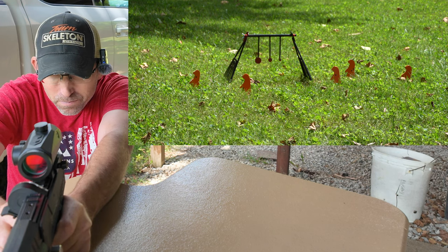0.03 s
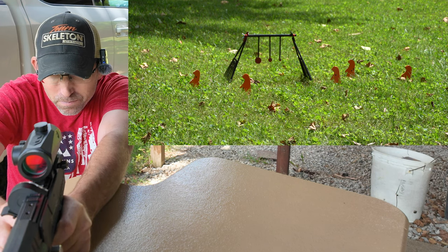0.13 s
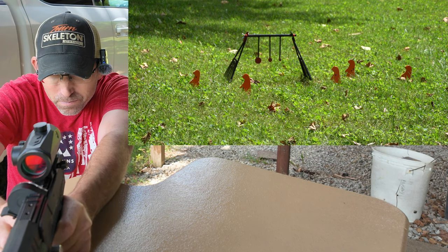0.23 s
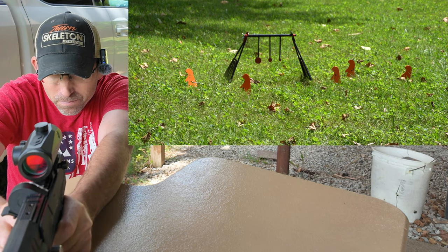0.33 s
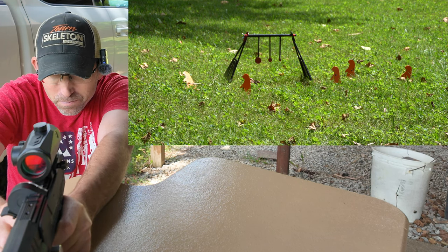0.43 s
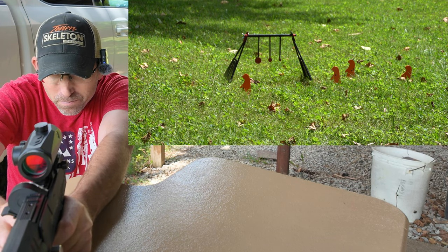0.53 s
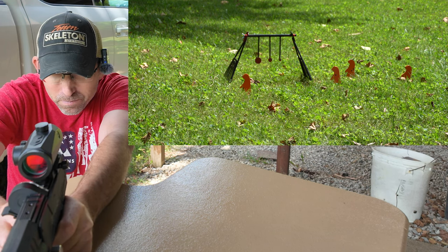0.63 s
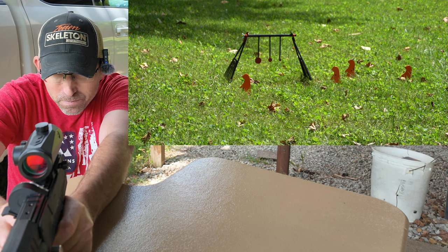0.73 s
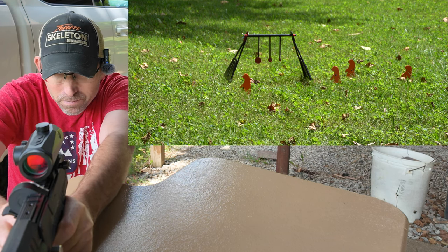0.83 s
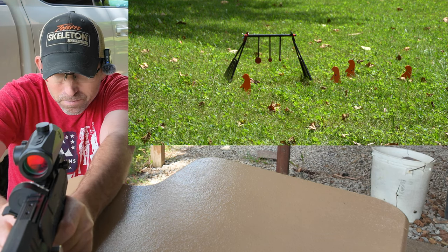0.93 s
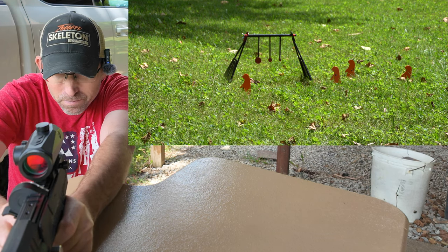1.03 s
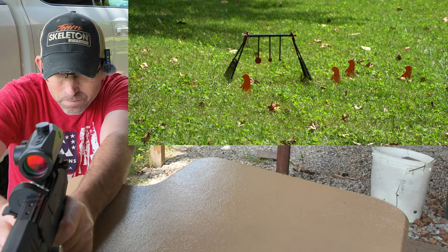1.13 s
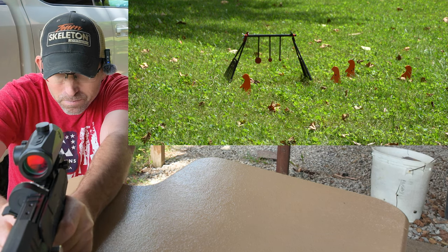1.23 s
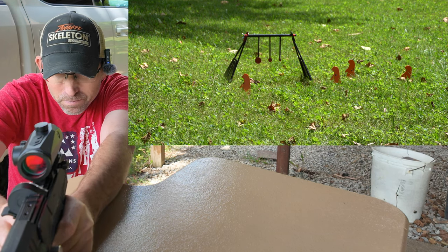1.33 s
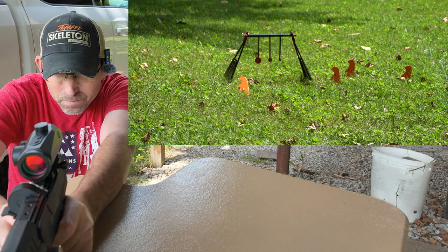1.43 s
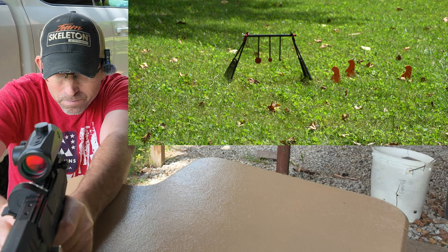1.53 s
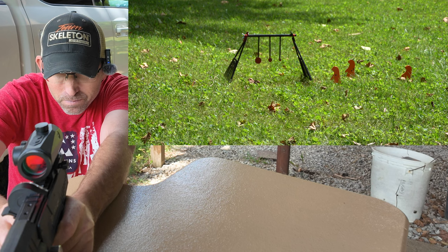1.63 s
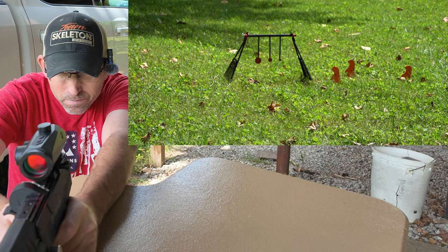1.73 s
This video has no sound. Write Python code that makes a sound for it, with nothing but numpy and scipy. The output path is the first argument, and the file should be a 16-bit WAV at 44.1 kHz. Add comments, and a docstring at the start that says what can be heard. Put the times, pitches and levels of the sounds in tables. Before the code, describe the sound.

An air pistol fires twice, about a second apart, close to the microphone under a shelter by a lawn. Right after each sharp pop, the pellet hits a small steel plate with a bright, short ring.

```python
"""An air pistol fires twice from under a shelter by a lawn, each shot knocking over a small steel plate.
A shot is a hammer click, a pressure pulse of gas and the clatter of the action; the shelter resonates,
the yard reverberates and a wall reflects a dull slap. About 70 ms after the pulse the pellet cracks on
a plate, whose modes ring and throb as it tumbles until the grass damps them. Small ticks follow.
Quiet air, distant insects and a low drone lie underneath."""
import sys
import numpy as np
from scipy import signal
from scipy.fft import rfft, irfft
from scipy.io import wavfile

SR = 44100
rng = np.random.default_rng(int(sys.argv[2]) if len(sys.argv) > 2 else 0)


def to_wav(s):
    """Save 16-bit WAV."""
    ch = np.atleast_2d(s).T  # columns
    pcm = np.round(np.clip(ch, -1, 1) * 32767)  # PCM
    wavfile.write(sys.argv[1], SR, pcm.astype(np.int16))


N = 79380
T = np.arange(N) / SR
HZ = np.fft.rfftfreq(N, 1 / SR)


def amp(db):
    """Amplitude ratio of a level in decibels."""
    return 10 ** (np.asarray(db) / 20)


def unit(x):
    """Normalisation to an rms of one."""
    return x / np.sqrt(np.mean(abs(x) ** 2) + 1e-20)


def read(points, hz, column=1):
    """Interpolation of a table column on a log-frequency axis."""
    columns = np.transpose(points)
    return np.interp(np.log(hz + 1), np.log(columns[0] + 1), columns[column])


def add(mix, s, sound):
    """Superposition of a sound delayed by s seconds."""
    start = max(round(s * SR), 0)
    mix[:, start:] += sound[..., :N - start]


def pan(db):
    """Level-difference panning: left and right gains."""
    return amp(np.array([[.5], [-.5]]) * db)


def noise(colour, place):
    """Partial coherence: two independent noises mix into a coloured stereo pair of unit rms."""
    a, b = rfft(rng.standard_normal((2, N)))
    coherence = np.clip(read(place, HZ, column=2), -1, 1)
    mid, side = a * np.sqrt(1 + coherence), b * np.sqrt(1 - coherence)
    spectrum = np.array([mid + side, mid - side]) * amp(read(colour, HZ)) * pan(read(place, HZ))
    return unit(irfft(spectrum, N))


# Spectra of the background: (frequency [Hz], relative level [dB])
AIR_SPECTRUM = [(25, -16), (50, -13.5), (80, -2.5), (130, 2), (250, -8), (400, -8), (650, -3), (1100, -9),
                (1900, -14.5), (2900, -14.5), (3800, -18.5), (7000, -23.5), (9500, -33), (16000, -42)]
INSECT_SPECTRUM = [(3500, -34), (5000, -10), (5800, 2), (6500, -0.5), (7300, -18.5), (9000, -40.5)]
DRONE_SPECTRUM = [(40, -30), (70, -3.5), (86, 1.5), (110, -15), (200, -45.5), (1000, -91)]
# Their envelopes: (time [s], level [dB])
AIR_ENVELOPE = [(0, -61.5), (.2, -61), (0.799, -63.5), (1.05, -65.5), (1.301, -67), (1.8, -63)]
INSECT_ENVELOPE = [(0, -71.5), (.7, -71.5), (1.2, -70.5), (1.8, -71)]
DRONE_ENVELOPE = [(0, -67.5), (.25, -67.5), (.6, -85)]
# Their stereo field: (frequency [Hz], left minus right [dB], coherence [ratio])
BACKGROUND_FIELD = [(200, 0, .998), (700, 0, 1), (2500, 0, 1), (6100, -1.3, 0.23)]
def background():
    """Ambient noise: air, a thin hiss of insects and a low drone that fades early."""
    layers = [(AIR_SPECTRUM, AIR_ENVELOPE), (INSECT_SPECTRUM, INSECT_ENVELOPE),
              (DRONE_SPECTRUM, DRONE_ENVELOPE)]
    return sum(noise(colour, BACKGROUND_FIELD) * amp(np.interp(T, *np.transpose(envelope)))
               for colour, envelope in layers)


# Stereo field of a knock: (frequency [Hz], left minus right [dB], coherence [ratio])
KNOCK_FIELD = [(500, 0.5, 0.95), (2000, -2.5, 0.99), (6000, 1.5, .87), (12000, 1, 1)]
def knock(colour, decay_s):
    """Impact transient: exponentially decaying noise, its energy set by the decay time."""
    fade = np.exp(-T / decay_s)
    return unit(noise(colour, KNOCK_FIELD) * fade) * np.sqrt(np.mean(fade ** 2))


# Impacts in the action: (time after the pop [s], relative level [dB], decay time [s])
ACTION_KNOCKS = [(-.0038, -22, .0015), (-.001, -13.5, .0015), (.0072, -19.5, .003), (.0098, -13, .002),
                 (0.0139, -18, .004), (0.0177, -15.5, .0025)]
# Their spectrum: (frequency [Hz], relative level [dB])
ACTION_SPECTRUM = [(100, -18.5), (600, -1), (1800, -1.5), (3800, 6.5), (5500, 3.5), (9000, -5.5),
                   (11500, -14), (16000, -20.5)]
def action(pop_s, shot_db, hammer_db):
    """Impact noise: the hammer clicks before the pop and the action clatters after it."""
    out = np.zeros((2, N))
    for delay, knock_db, decay_s in ACTION_KNOCKS:
        db = shot_db + knock_db + (hammer_db if delay < 0 else 0)
        add(out, pop_s + delay, amp(db) * knock(ACTION_SPECTRUM, decay_s))
    return out


def struck(modes, contact_s=.0003):
    """Free vibration: damped modes, their onset softened by the contact time of the blow."""
    onset = 1 - np.exp(-(T / contact_s) ** 2)
    return onset * sum(amp(db - 60 * T / t60) * np.sin(2 * np.pi * hz * T) for hz, db, t60 in modes)


# Direct and reflected paths of the pulse: (delay [s], gain [ratio])
PULSE_PATHS = [(0, 1), (.0018, 0.82), (0.0102, .45)]
# Modes of the table and the pistol's body: (frequency [Hz], relative level [dB], T60 [s])
BODY_MODES = [(339, -27.5, 0.14), (470, -29, .035), (588, -28.5, .04), (1220, -20.5, 0.0081)]
# Balance of the pop, mostly to the right: (frequency [Hz], left minus right [dB])
POP_BALANCE = [(200, 6.5), (500, -1), (1000, -6), (2000, -12.5), (4000, -2)]
def gas_pop(pulse_s=.00028, pulse_db=-1, cutoff_hz=1000):
    """Monopole radiation: the gas sends out a compression and a rarefaction, and jolts table and gun."""
    pulse = (1 - T / pulse_s) * np.exp(-T / pulse_s)
    pressure = np.zeros((2, N))
    for delay, gain in PULSE_PATHS:
        add(pressure, delay, gain * pulse)
    pressure = signal.lfilter(*signal.butter(1, cutoff_hz, fs=SR), pressure)
    pop = amp(pulse_db) * pressure + struck(BODY_MODES)
    return irfft(rfft(pop) * pan(read(POP_BALANCE, HZ)), N)


# Stereo field of the yard: (frequency [Hz], left minus right [dB], coherence [ratio])
YARD_FIELD = [(250, -4.5, .999), (500, .5, 1), (1000, 0.5, .8), (1990, 1.5, 0.95), (4500, 2.5, .55),
              (12000, 4, .4)]
def diffuse_tail(colour, t60):
    """Diffuse decay: each band of noise falls 60 dB in its own reverberation time."""
    hz, t, bands = signal.stft(noise(colour, YARD_FIELD), SR, nperseg=512)
    decay = amp(-60 * t / read(t60, hz)[:, None])
    return signal.istft(bands * decay, SR, nperseg=512)[1][:, :N]


# Spectrum of the yard's echo: (frequency [Hz], relative level [dB])
YARD_SPECTRUM = [(40, -24.5), (120, -2.5), (200, 0), (320, 3), (600, 3), (1300, -3), (2300, -3.5),
                 (3800, -3.5), (7000, -1), (9500, 0.5), (12000, -7.5), (16000, -9.5)]
# Its reverberation time: (frequency [Hz], T60 [s])
YARD_T60 = [(60, .5), (140, 0.82), (400, 0.59), (1200, .5), (4000, 0.56), (8000, 0.29), (15000, 0.31)]
def yard_echo(rise_s=.012, db=-21.5):
    """Reverberation: sound scattered around the yard builds up and dies away."""
    return (1 - np.exp(-T / rise_s)) * amp(db) * diffuse_tail(YARD_SPECTRUM, YARD_T60)


# Low modes of the shelter: (frequency [Hz], relative level [dB], T60 [s])
SHELTER_MODES = [(127, -53.5, 1.6), (135.2, -48.5, 1.5), (198, -38, 0.89), (268.6, -40.5, .35),
                 (332.5, -32, 0.25), (347, -34.5, .62), (389.5, -34.5, 0.27), (598.3, -38, 0.12)]
def shelter_boom(rise_s=.0083):
    """Resonance: the shot excites the shelter's modes, which hum on in random phase."""
    boom = sum(amp(db - 60 * T / t60) * np.sin(2 * np.pi * (hz * T + rng.random()))
               for hz, db, t60 in SHELTER_MODES)
    return (1 - np.exp(-T / rise_s)) * boom


# Spectrum of the wall's reflection: (frequency [Hz], relative level [dB])
SLAP_SPECTRUM = [(60, -28.5), (180, -5.5), (290, -2.5), (420, -6.5), (800, -19), (2000, -40), (8000, -62.5)]
def wall_slap(rise_s=.001, decay_s=.018, db=-28):
    """Discrete reflection: a nearby wall returns the shot as a dull burst."""
    return (1 - np.exp(-T / rise_s)) * amp(db) * knock(SLAP_SPECTRUM, decay_s)


# Shots: (time of the pop [s], shot gain [dB], echo gain [dB], extra hammer gain [dB])
PISTOL_SHOTS = [(0.2407, 1, 1, -2.5), (1.3443, 1, 0.5, 4)]
def pistol(slap_delay_s=.054):
    """Direct and reflected sound: each shot is answered by the yard, the shelter and the wall."""
    out = np.zeros((2, N))
    for s, shot_db, echo_db, hammer_db in PISTOL_SHOTS:
        echoes = shelter_boom() + yard_echo()
        add(echoes, slap_delay_s, wall_slap())
        add(out, s, amp(shot_db) * gas_pop() + amp(echo_db) * echoes)
        out += action(s, shot_db, hammer_db)
    return out


def plate_ring(modes, lands_s, damping_db, tumble_hz, throb_depth):
    """Amplitude modulation: modes swell, throb as the plate turns and drop as it lands; echoes linger."""
    swell_share, throb_peak_s, throb_fade_s, landing_s = .77, .018, .25, .021
    scatter_depth, scatter_hz = .56, 22
    throb = throb_depth * np.exp(-T / throb_fade_s) * np.cos(2 * np.pi * tumble_hz * (T - throb_peak_s))
    landed = .5 + .5 * np.tanh((T - lands_s) / (2 * landing_s))
    smoothing = signal.butter(2, scatter_hz, fs=SR, output="sos")
    out = np.zeros((2, N))
    for hz, db, t60, side_db, swell_s in modes:
        # Scattering makes amplitude and phase waver at random.
        drift = rng.standard_normal((2, N)) + 1j * rng.standard_normal((2, N))
        drift = unit(signal.sosfilt(smoothing, drift))
        swell = 1 - swell_share * np.exp(-T / swell_s)
        level = swell * amp(db - 60 * T / t60 - damping_db * landed)
        # The echoes are more even in level and decay than the modes, with extra loss in the treble.
        echo_db, echo_t60 = -28 + .55 * db, np.sqrt(1.4 * t60)
        absorption_db_per_s = 59.5 * (hz / 10000) ** 4
        echo = amp(echo_db - 60 * T / echo_t60 - absorption_db_per_s * T)
        envelope = level * pan(side_db) * (1 + throb + scatter_depth * drift) + echo * drift
        out += (envelope * np.exp(2j * np.pi * hz * T)).real
    return out


# Pellet impacts: (time [s], crack level [dB], splash level [dB], fall time [s],
# drop on landing [dB], tumble rate [Hz], throb depth [ratio])
PELLET_HITS = [(0.308, 2, -24, 0.25, 20.5, 14, 0.26), (1.4118, -2.5, -18.5, 0.16, 12, 19.5, 0.37)]
# Modes, one list a plate: (frequency [Hz], level [dB], T60 [s], left minus right [dB], swell time [s])
PLATE_MODES = [
    [(2805, -36.5, 0.44, -1, 0.0014), (4834, -34, 0.49, 1, .002), (6110, -31, .5, -0.5, .01),
     (6520, -28.5, .25, 1.5, .005), (6977, -7, 0.61, 4, .02), (8935, -16.5, 0.26, 2, 0.0017),
     (9750, -31.5, 0.47, 2, 0.0024), (10700, -31.5, .15, -8, .003), (12070, -18, 0.17, 5, 0.017),
     (13110, -38, .3, 5, .005), (14460, -28, .2, 4, .003)],
    [(2846, -31, .3, 4, 0.0016), (3540, -35.5, 0.65, -3.5, 0.0014), (5300, -28, 0.56, 6.5, 0.0049),
     (5960, -34.5, 0.62, 12, .01), (6410, -26, 0.49, -2, .01), (7520, -15, 0.68, 10, 0.0017),
     (9223, -10, 0.45, 0, 0.097), (13300, -18.5, 0.27, 4.5, 0.0057), (13574, -30, 0.25, 0, .005),
     (15000, -33, 0.19, 4, .005)],
]
# Spectra of lead striking steel and of its diffuse splash of sound: (frequency [Hz], relative level [dB])
CRACK_SPECTRUM = [(50, -10), (300, -22), (1500, -28), (2500, -14), (3800, 0.5), (7000, 2), (10000, -0.5),
                  (16000, -5.5)]
SPLASH_SPECTRUM = [(100, -37), (1500, -12), (3000, -2.5), (6500, 2.5), (9500, 1), (12000, -5.5),
                   (16000, -17.5)]
# Decay of the splash: (frequency [Hz], T60 [s])
SPLASH_DECAY = [(1000, 0.61), (5000, 0.47), (9000, 0.38), (15000, .16)]
def pellet_hits(crack_s=.0005):
    """Impulse excitation: each pellet's brief contact gives a broadband crack and sets its plate ringing."""
    out = np.zeros((2, N))
    for (s, crack_db, splash_db, *fall), modes in zip(PELLET_HITS, PLATE_MODES):
        crack = amp(crack_db) * knock(CRACK_SPECTRUM, crack_s)
        splash = amp(splash_db) * diffuse_tail(SPLASH_SPECTRUM, SPLASH_DECAY)
        add(out, s, crack + splash + plate_ring(modes, *fall))
    return out


# Small impacts, likely spent lead and falling steel: (time [s], gain [dB])
TICK_EVENTS = [(0.45, -20.5), (.8945, -62), (1.4585, -23.5), (1.512, -30.5)]
# Their modes: (frequency [Hz], relative level [dB], T60 [s])
TICK_RESONANCES = [(1105, -16, 0.019), (2980, -0.5, 0.021), (3705, 5.5, 0.011), (4400, 1.5, .014),
                   (6140, -6, 0.018)]
def ticks():
    """Heavy damping: modes that die within about 20 ms are heard as ticks."""
    out = np.zeros((2, N))
    for s, db in TICK_EVENTS:
        add(out, s, amp(db) * struck(TICK_RESONANCES))
    return out


def scene():
    """Linear superposition of the pistol, the targets and the open air."""
    return pistol() + pellet_hits() + ticks() + background()


def close_pair(x, mono_below_hz=380, bass_side_share=.12):
    """Coherence at long wavelengths: two closely spaced microphones hear the bass alike."""
    mid, side = (x[0] + x[1]) / 2, (x[0] - x[1]) / 2
    high_pass = HZ ** 2 / (HZ ** 2 + mono_below_hz ** 2)
    side = irfft(rfft(side) * (high_pass * (1 - bass_side_share) + bass_side_share), N)
    return np.array([mid + side, mid - side])


def record(dry):
    """Band limiting and overload: a low cut, clipping of the sharpest peaks, then a low-pass."""
    low_cut_hz, band_edge_hz = 68, 16200
    low_cut = signal.butter(2, low_cut_hz, "high", fs=SR)
    clipped = np.clip(signal.lfilter(*low_cut, close_pair(dry)), -1, 1)
    low_pass = signal.firwin(255, band_edge_hz, window=("kaiser", 8), fs=SR)
    return signal.oaconvolve(clipped, low_pass[None], "same")


dry = scene()
out = record(dry)
to_wav(out)
```